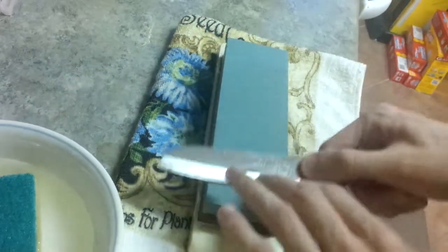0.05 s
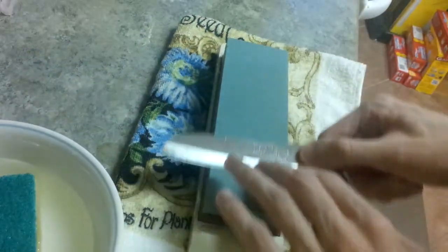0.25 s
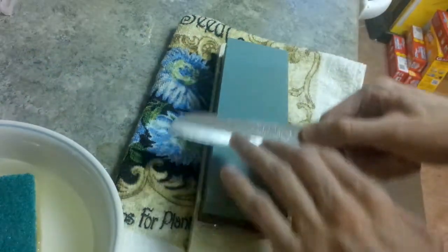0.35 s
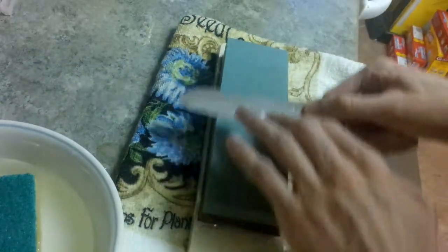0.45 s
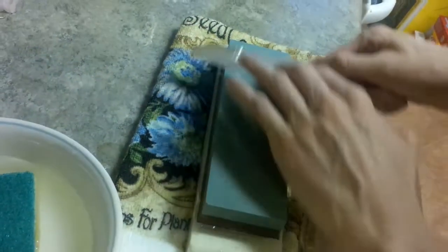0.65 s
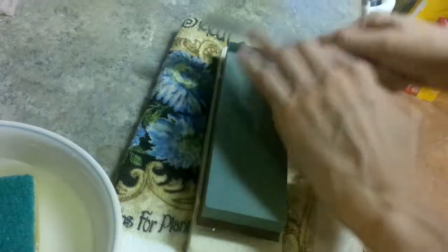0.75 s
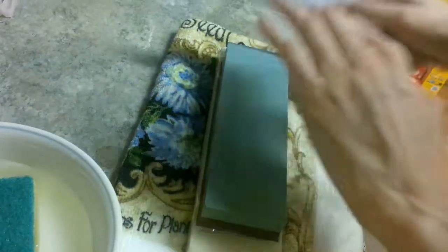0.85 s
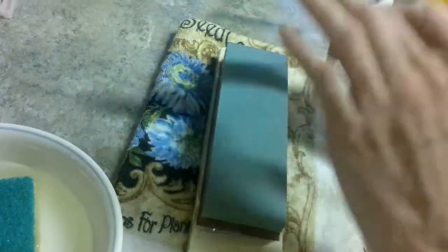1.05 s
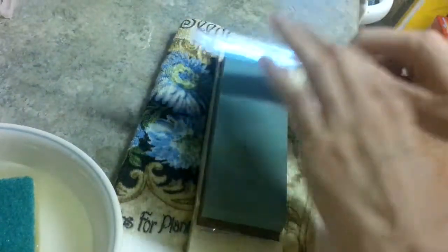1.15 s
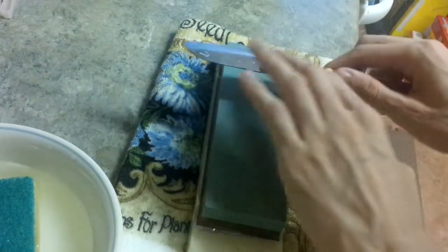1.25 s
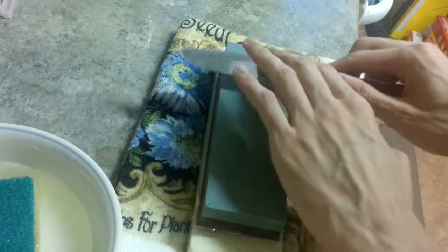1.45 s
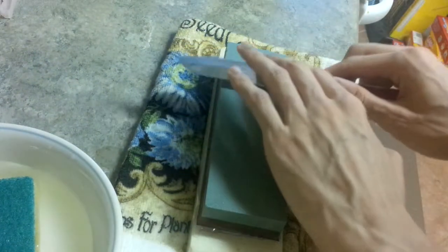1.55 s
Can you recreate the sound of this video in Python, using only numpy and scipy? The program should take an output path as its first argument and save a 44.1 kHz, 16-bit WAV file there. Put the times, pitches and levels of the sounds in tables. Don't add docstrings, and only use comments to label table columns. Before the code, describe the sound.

A steel blade is pushed once over a gritty sharpening stone, rasping for about half a second with crackly catches, then knocking dully at the far end; short room tail, then quiet low hum and air, heard close in stereo.

```python
import sys
import numpy as np
from scipy import signal
from scipy.fft import rfft, irfft, next_fast_len
from scipy.io import wavfile
from scipy.ndimage import map_coordinates

SR = 44100
rng = np.random.default_rng(int(sys.argv[2]) if len(sys.argv) > 2 else 0)


def dump(signal):
    limited = np.clip(np.atleast_2d(signal).T, -1, 1)
    pcm = np.round(limited * 32767).astype(np.int16)
    wavfile.write(sys.argv[1], SR, pcm)


def boost(x):
    u = np.asarray(x, float) / 20
    return 10 ** u


N = 70560


def unit(x):
    return x / np.sqrt(np.mean(x ** 2) + 1e-20)


def along(points, hz):
    f, value = np.transpose(points)
    return np.interp(np.log(hz + 1), np.log(f + 1), value)


def wobble(rate):
    knots = rng.standard_normal(int(N * rate / SR) + 4)
    return map_coordinates(knots, [np.arange(N) * rate / SR])


def filtered(x, response):
    m = next_fast_len(N + SR // 4)
    return irfft(rfft(x, m) * response(np.fft.rfftfreq(m, 1 / SR)), m)[..., :N]


def peak(f, hz, width):
    damping = 1j * f * width
    return damping / (hz * hz - f * f + damping)


def pair(a, b, alike):
    turn = np.arccos(np.clip(alike, -1, 1)) / 2
    shared, opposed = np.cos(turn) * a, np.sin(turn) * b
    return np.array([shared + opposed, shared - opposed])


def room_air():
    # f/Hz, level/dB per Hz
    air = [(45, -4), (130, -3), (220, -8.5), (300, -6), (800, -11), (2000, -23), (12400, -38.5),
           (13000, -65)]
    # f/Hz, coherence
    air_alike = [(30, 0.38), (100, .6), (350, 0.063), (700, 0.38), (3000, 0.052)]

    def turn(f):
        return np.arccos(np.clip(along(air_alike, f), -1, 1)) / 2

    a, b = filtered(rng.standard_normal((2, N)), lambda f: boost(along(air, f)))
    shared = filtered(a, lambda f: np.cos(turn(f)))
    opposed = filtered(b, lambda f: np.sin(turn(f)))
    level_db = -61.5 + 0.8 * wobble(5.93)
    return boost(level_db) * unit(np.array([shared + opposed, shared - opposed]))


def fridge():
    # f/Hz, width/Hz, level/dB
    hum = [(25.1, 25, -68), (61.4, 7, -60), (86.68, 5.6, -59), (109.8, 7, -67.5), (183.6, 6.3, -75.5),
           (160, 70, -72.5)]
    out = 0
    for hz, width, db in hum:
        a, b = filtered(rng.standard_normal((2, N + SR)), lambda f: peak(f, hz, width) ** 2)
        out = out + boost(db) * unit(pair(a, b, 0.73)) * boost([[-1.1], [1.1]])
    return out


def snag_force(t):
    # t/s, peak level/dB
    snags = [(0.1677, -29.5), (0.1758, -25), (0.2009, -26), (.2162, -22), (0.2386, -20), (0.2531, -19.5),
             (.283, -21.5), (.304, -14), (0.3524, -18.5), (.3878, -17.5), (0.408, -19.5), (.4327, -23),
             (0.452, -20), (0.4688, -22), (0.4992, -22.5), (0.554, -21), (0.6117, -23.5), (0.6602, -24.5),
             (0.6849, -23.5), (0.704, -22), (0.732, -22.5)]
    start, peak_db = np.transpose(snags)[:, :, None]
    t60, rise_s = 0.011, 0.0011
    since = np.maximum(t - start, 0)
    decay = boost(peak_db - 19.5 - 60 * since / t60)
    return 10 * (decay * (1 - np.exp(-since / rise_s))).sum(axis=0)


def rasp():
    # t/s, level/dB, place on the stone (0 near end, 1 far end)
    stroke = [
        (.153, -68.5, 0.3),
        (.165, -43.5, 0.77),
        (0.191, -56, 0.2),
        (0.196, -36.5, 0.45),
        (0.317, -23, 0),
        (.345, -31.5, 0.2),
        (.555, -30.5, 0.97),
        (.655, -36, 1.06),
        (.741, -31.5, 1.39),
    ]
    # f/Hz, width/Hz, near-end level/dB, far-end
    # level/dB, left lead/rad
    body = [(1490, 170, -5, -11.5, 2.5), (2240, 700, -21, -16, 3), (2800, 590, -21.5, -14, 2.5),
            (3714, 280, -5, -2.5, 0.45), (4024, 300, 1.5, -6, 2.5), (4595, 600, -3.5, -7, -0.1),
            (5260, 500, 0.5, -1, -1.5), (5726, 455, 1, 0, -0.22), (7150, 1300, -14.5, -8.5, -2),
            (8100, 924, -21, -14, -0.9), (9610, 1100, -13.5, -10.5, -1.5), (10820, 980, -11.5, -5, 1),
            (12300, 1600, -16.5, -14, 1.5), (14600, 2400, -24.5, -19.5, -1),
            (155.1, 43, -27.5, -14, 0), (306, 200, -32.5, -28.5, 0), (870, 270, -28, -27.5, .4),
               (1305, 275, -10, -12, 1.7)]
    grit_per_s, grit_spread_db = 14000, 3.2
    lift_t60 = 0.021

    t = np.arange(N) / SR
    s, level_db, place = np.transpose(stroke)
    level_db = np.interp(t, s, level_db) - 60 * np.maximum(t - s[-1], 0) / lift_t60
    place = np.interp(t, s, place)
    pressure = boost(level_db) * (t > s[0])

    hits = rng.random(N) < grit_per_s / SR
    grit = hits * boost(grit_spread_db * rng.exponential(size=N))
    clump_db = 1.78 * wobble(450) + 0.5 * wobble(30)
    grit = grit * boost(clump_db)
    snags = snag_force(t)
    coarse = unit(grit) * pressure + snags
    fine = unit(grit ** 0.57) * pressure + snags * boost(-6)

    sides = np.array([[1], [-1]])
    out = 0
    for hz, width, near_db, far_db, lead in body:
        force, alike = (coarse, 0.91) if hz < 6500 else (fine, 0.6)
        mode_db = near_db + (far_db - near_db) * place + 1.3 * wobble(40)
        a, b = force * rng.standard_normal((2, N)) * boost(mode_db)

        def mode(f):
            return peak(f, hz, 1.943 * width) ** 3 * np.exp(0.5j * lead * sides)

        out = out + filtered(pair(a, b, alike), mode)
    return out * boost(11.5)


def knocks():
    # t/s, level/dB, hardness/dB per octave
    impacts = [
        (.166, -51, -0.5),
        (.702, -31.5, 16),
        (.73, -30, 17),
        (.738, -37, -1.5),
    ]
    # f/Hz, level/dB, t60/s
    stone = [(531, -6.5, 0.045), (815, -1.5, .04), (1126, -3.5, 0.055), (1379, -3, 0.045)]
    out = np.zeros((2, N))
    t = np.arange(SR // 8) / SR
    onset = 1 - np.exp(-t / 0.004)
    for s, db, hard_db in impacts:
        start = round(s * SR)
        for hz, mode_db, t60 in stone:
            turn = np.array([[0.5], [-0.5]]) * (hz / 1000) ** 2
            level_db = db + mode_db + hard_db * np.log2(hz / 1250)
            decay = boost(level_db - 60 * t / t60)
            out[:, start:start + len(t)] += decay * onset * np.sin(2 * np.pi * hz * t + turn)
    return out


def room(x):
    # f/Hz, t60/s
    reverb = [(500, 0.14), (2600, 0.28), (4000, 0.31), (10000, 0.25), (14000, 0.34)]
    hz, t, z = signal.stft(rng.standard_normal((2, SR // 2)), SR, nperseg=256)
    decay = boost(-60 * t / along(reverb, hz)[:, None])
    tail = signal.istft(z * decay, SR, nperseg=256)[1]
    tail = tail / np.linalg.norm(tail[0])
    delayed = np.pad(x, ((0, 0), (200, 0)))
    return signal.fftconvolve(delayed, tail, axes=1)[:, :N]


def scene():
    background = room_air() + fridge()
    knife = rasp() + knocks()
    return knife + boost(-6.5) * room(knife) + background


def band_limit(x):
    return signal.sosfilt(signal.butter(12, 15810, fs=SR, output="sos"), x)


def record(dry):
    top_hz = 15800
    mix = filtered(dry, lambda f: f < top_hz)
    return band_limit(mix)


dry = scene()
out = record(dry)
dump(out)
```